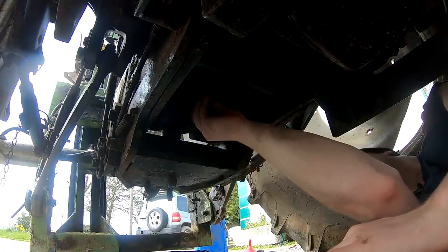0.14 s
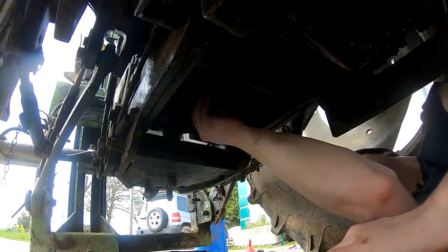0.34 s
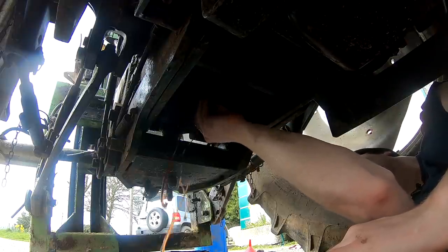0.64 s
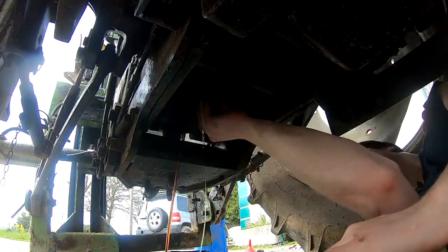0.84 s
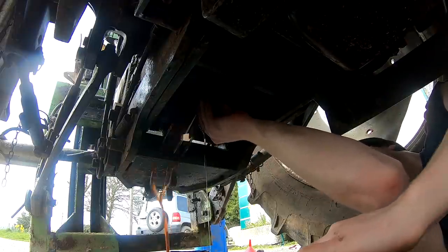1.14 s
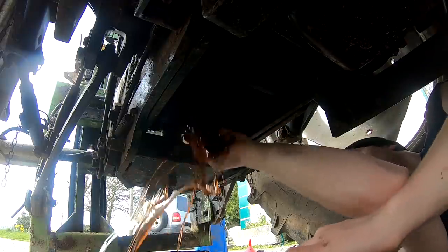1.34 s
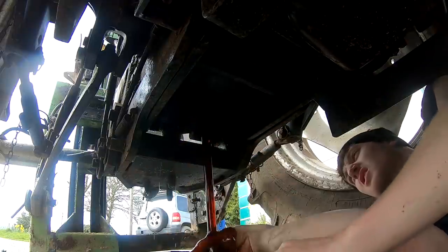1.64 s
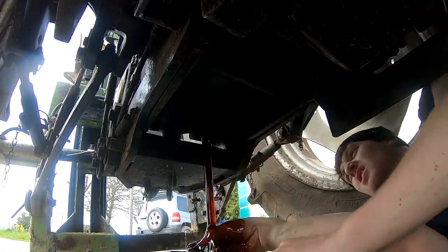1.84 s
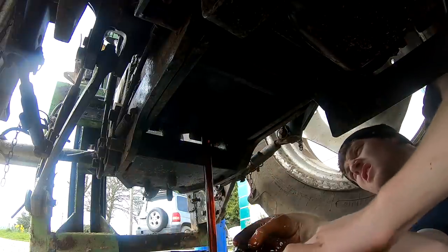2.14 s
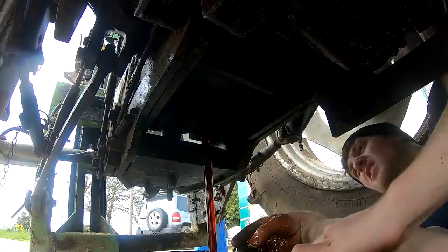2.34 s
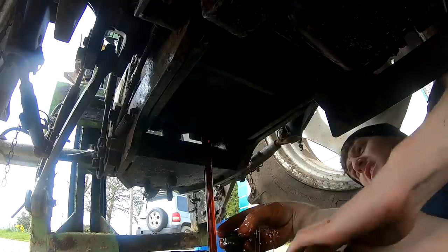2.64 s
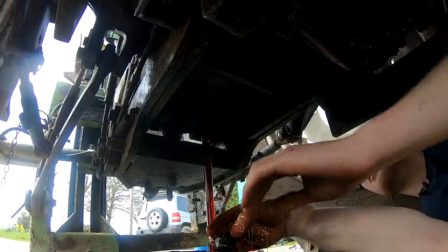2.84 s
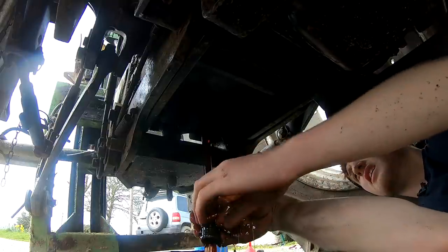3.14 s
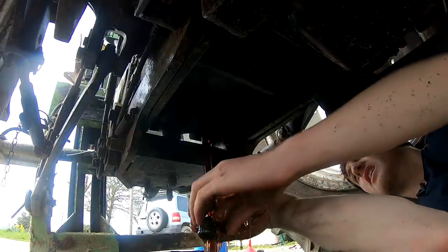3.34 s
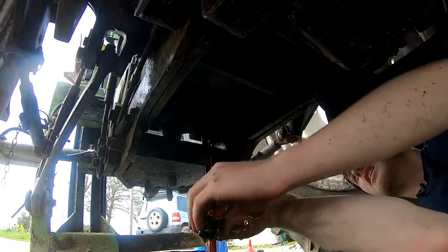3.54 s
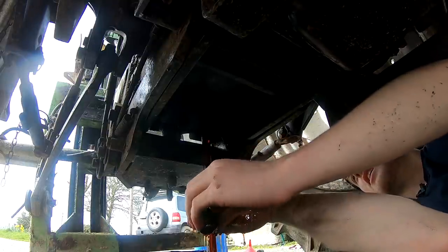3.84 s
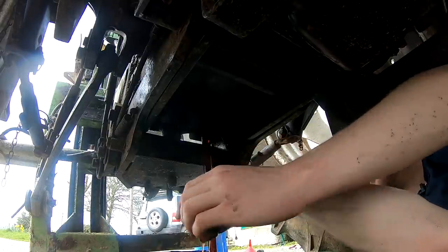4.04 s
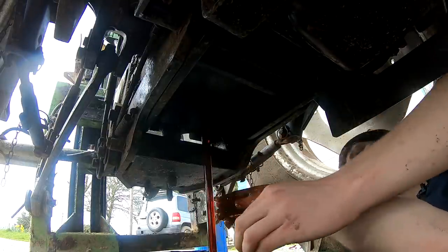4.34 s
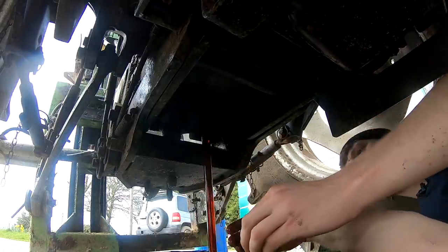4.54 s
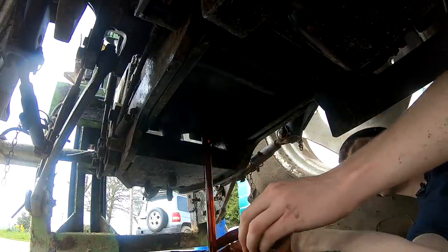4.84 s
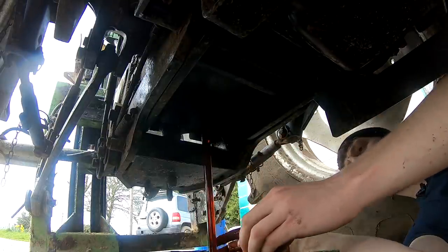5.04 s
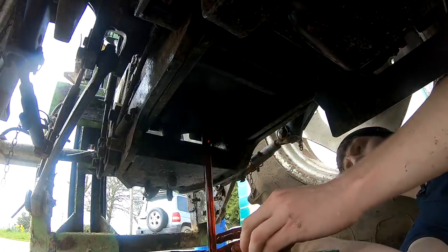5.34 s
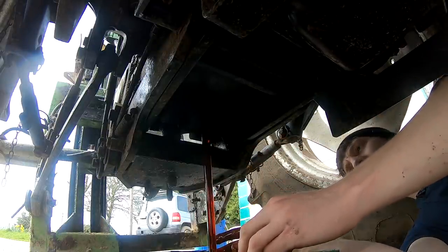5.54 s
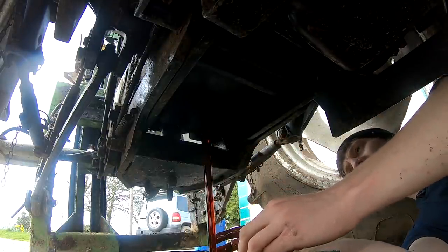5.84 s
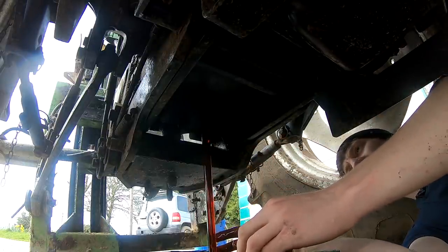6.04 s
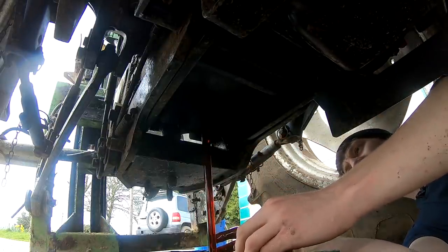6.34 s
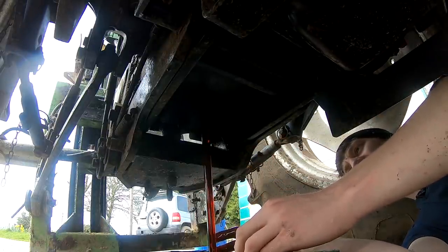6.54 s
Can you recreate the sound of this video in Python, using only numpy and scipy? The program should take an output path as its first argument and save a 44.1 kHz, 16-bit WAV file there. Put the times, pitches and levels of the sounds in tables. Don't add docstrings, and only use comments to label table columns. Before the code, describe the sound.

A few stray drops tick, then thick oil splatters hollowly into a plastic pan before quieting to faint drips over soft outdoor traffic rumble.

```python
import sys
import numpy as np
from scipy import signal
from scipy.fft import rfft, irfft, next_fast_len
from scipy.io import wavfile
from scipy.ndimage import uniform_filter1d

SR = 44100
rng = np.random.default_rng(int(sys.argv[2]) if len(sys.argv) > 2 else 0)


def store_pcm(level_fs):
    pcm = np.round(np.clip(level_fs, -1, 1) * 32767).astype(np.int16)
    wavfile.write(sys.argv[1], SR, np.atleast_2d(pcm).T)


def how_loud(loudness_db):
    steps = np.asarray(loudness_db, float) / 20
    return 10 ** steps


N = 295029
T = np.arange(N) / SR


def unit(x):
    return x / np.sqrt(np.mean(x ** 2))


def coloured(points, lo_hz=0, hi_hz=SR):
    hz, db = np.transpose(points)
    size = next_fast_len(N)
    f = np.arange(size // 2 + 1) * SR / size + 1e-3
    gain = how_loud(np.interp(np.log(f), np.log(hz), db, left=-90, right=-90))
    gain = gain * (f >= lo_hz) * (f < hi_hz)
    return unit(irfft(rfft(rng.standard_normal(size)) * gain, size)[:N])


def patchy(points, edges, rate, patchy_db):
    spectrum = rfft(coloured(points))
    f = np.arange(N // 2 + 1) * SR / N
    out = np.zeros(N)
    for lo, hi in zip(edges, edges[1:]):
        band = irfft(spectrum * (f >= lo) * (f < hi), N)
        out += band * how_loud(patchy_db * walk(rate))
    return unit(out)


def walk(rate):
    k = int(SR / rate)
    steps = np.repeat(rng.standard_normal(N // k + 1), k)
    return unit(uniform_filter1d(uniform_filter1d(steps, k), k)[:N])


def ring(x, hz, width):
    return signal.lfilter(*signal.iirpeak(min(hz, SR / 2.2), hz / width, fs=SR), x)


def fade(t, t60):
    return np.exp(-np.log(1000) * t / t60)


def burst(t60, rise_s):
    t = T[:int(SR * t60)]
    shape = (1 - np.exp(-t / rise_s)) * fade(t, t60)
    return shape / shape.max()


def patter(rate, spread_db, smear_s):
    chance = rng.random((2, N))
    landed = chance[0] < rate / SR
    sizes = landed * how_loud(spread_db * np.minimum(-np.log(chance[1] + 1e-9), 3))
    power = signal.lfilter([1], [1, -np.exp(-1 / (smear_s * SR))], sizes ** 2)
    return unit(np.sqrt(power + 1e-9))


def add(out, s, x):
    i = int(s * SR)
    out[i:i + len(x)] += x[:N - i]


def pan(modes, force):
    power, out = 0, np.zeros(N)
    for hz, width, db in modes:
        power += how_loud(db) ** 2 * np.pi * width / SR
        struck = ring(force * rng.standard_normal(N), hz, 6.6 * width)
        out += how_loud(db) * ring(struck, hz, width)
    return out / np.sqrt(power)


# start_s, flow_db, breakup_db (how much the jet breaks into spatter)
FLOW = [(0.978, -51, -9), (1.05, -36, -9.5), (1.19, -36.5, -9), (1.292, -29, -13.5), (1.476, -36, -10),
        (1.54, -27, -13.5), (1.59, -37.5, -0.5), (1.656, -38, -11), (1.744, -50, -6), (1.86, -43.5, -22.5),
        (2.01, -32.5, -10.5), (2.092, -39, -1.5), (2.158, -27, -7), (2.236, -31, -9.5), (2.338, -57.5, -14),
        (2.362, -41, -7), (2.53, -49.5, -8.5), (2.8, -67, -19)]
# start_s, peak_db, high_over_deep_db, spatter_db
SLUGS = [(0.689, -29, 2, -11), (0.696, -22, 13, -19), (0.708, -24.5, -17, -11),
         (0.761, -33.5, 6, -7.5), (0.982, -32, 3, -16.5), (1.021, -19.5, 7, -19.5),
         (1.039, -28, 1, -28), (1.063, -23.5, 25, -38), (1.092, -19.5, 10, -21), (1.11, -24, -13, -18),
         (1.151, -18, -1, -38), (1.197, -26.5, 28, -23), (1.22, -35, 22, -6), (1.244, -19.5, 6, -14.5),
         (1.289, -17.5, 16, -15.5), (1.331, -22, 5, -11.5), (1.349, -20, 7, -34),
         (1.379, -15.5, 13, -36), (1.416, -19.5, 15, -22), (1.472, -14.5, 12.5, -43),
         (1.525, -15.5, 11, -23), (1.565, -15.5, 12, -25), (1.584, -15, -2, -21),
         (1.606, -12.5, -1, -16), (1.63, -29, -14, -6), (1.666, -21.5, 5, -16), (1.688, -47, -7, 6),
         (1.718, -28.5, -5, -16),
         (1.772, -22, -14, -26), (1.822, -24, -14, -8.5), (1.846, -28, -7, -29),
              (1.867, -25, -18, -11), (1.928, -26.5, -15, -10), (1.973, -22.5, 1, -7),
              (2.015, -20, 25.5, -22), (2.077, -16, 10.5, -25), (2.111, -17, 15, -13.5),
              (2.139, -19, 24, -19), (2.175, -21.5, 22, -10.5), (2.231, -15, -7, -19),
              (2.371, -30, -33, -16), (2.401, -19.5, 3, -19.5), (2.44, -26, -17, -14.5),
              (2.479, -28.5, 9, -19)]
# start_s, peak_db, t60_s
SPLATS = [(0.699, -33, 0.074), (0.763, -42, 0.046), (1.0235, -43.5, 0.16), (1.159, -38.5, 0.41),
          (1.245, -43.5, 0.071), (1.279, -36.5, 0.14), (1.407, -35, 0.29), (1.47, -31.5, 0.089),
          (1.5196, -35, 0.13), (1.5393, -35, 0.56), (1.6047, -35, 0.18), (1.6645, -34.5, 0.2),
          (1.687, -36, 0.046), (1.7163, -26.5, 0.024), (1.769, -32.5, 0.11), (1.82, -42.5, 0.32),
          (1.904, -40, 0.15), (2.031, -35.5, 0.19), (2.0566, -30.5, 0.13), (2.0774, -26, 0.14),
          (2.2335, -35, 0.032), (2.315, -37, 0.035), (2.4014, -45, 0.27)]
# pitch_hz, width_hz, level_db
DEEP_MODES = [(165, 28, -14.5), (241, 43, -9.5), (290, 26, -1.5), (356, 21, 1), (418, 47, 2)]
MIDDLE_MODES = [(476, 46, -2), (532, 36, -2), (563, 35, -4), (653, 49, 3.5), (705, 450, -20.5)]
UPPER_MODES = [(842, 16.5, -0.5), (966, 32, 3), (1068, 82, -5), (1115, 49, -3.5), (1220, 32, -3.5),
               (1401, 38, -13.5), (1650, 19, -13)]
# pitch_hz, level_db (per Hz)
SPATTER_COLOUR = [(850, 10), (1450, -4.5), (1690, 0.5), (1820, 1.5), (1990, -2), (2670, 2), (3090, -4.5),
                  (3290, -4.5), (3960, -12.5), (5000, -17.5), (6500, -25), (11000, -120)]
SPRAY_COLOUR = [(2650, 9), (4500, 0), (6820, -7), (7800, -10.5), (10400, -11.5), (12700, -11), (13600, -16)]


def gush():
    s, flow_db, breakup_db = np.transpose(FLOW)
    drum = how_loud(np.interp(T, s, flow_db, left=-120, right=-120))
    clumps = how_loud(3 * walk(45))
    spatter = how_loud(np.interp(T, s, flow_db + breakup_db, left=-120, right=-120)) * clumps
    spray = spatter * how_loud(-12.5)
    shake = drum * how_loud(-18)
    drops = patter(670, spread_db=-2.0, smear_s=0.0018)

    slugs = np.zeros((4, N))
    for s, db, high_db, spatter_db in SLUGS:
        shares_db = (-12 - high_db / 2, -3, -10.5 + high_db / 2, spatter_db)
        for line, rel_db in zip(slugs, shares_db):
            add(line, s - .0015, how_loud(db + rel_db) * burst(0.12, rise_s=0.00082))
    splats = np.zeros(N)
    for s, db, t60 in SPLATS:
        add(splats, s - .001, how_loud(db - 11) * burst(max(t60, .02), rise_s=0.003))

    deep, middle, upper = [np.hypot(how_loud(db) * drum * drops, how_loud(-10.0) * slug)
                           for db, slug in zip((-9, -5, -7), slugs)]
    body = pan(DEEP_MODES, deep) + pan(MIDDLE_MODES, middle) + pan(UPPER_MODES, upper)
    slap = coloured([(200, -18), (350, -2.0), (700, 9.5), (1200, -9.5), (2000, -5.5), (3000, -55)])
    body += how_loud(-6.5) * middle * slap
    body = np.interp(T + .0004 * walk(20), T, body)

    splash = np.hypot(spatter * patter(450, spread_db=5.5, smear_s=.0015), how_loud(-6) * slugs[3])
    splash = splash * patchy(SPATTER_COLOUR, np.geomspace(800, 7000, num=12), 60, patchy_db=2.5)
    mist = np.hypot(spray * drops * patter(200, spread_db=3.0, smear_s=.003), splats)
    mist = mist * patchy(SPRAY_COLOUR, np.geomspace(2500, 14000, num=16), 90, patchy_db=3)
    ground = coloured([(18, -5), (60, 9.0), (160, -8.0), (280, -35)])
    ground = shake * how_loud(2.8 * walk(26.3)) * ground
    return body + splash + mist + how_loud(-4.5) * ground


# start_s, peak_db, pitch_hz (centre of the slap)
BLOWS = [(0.701, -31.5, 616), (0.711, -20.5, 484), (0.7615, -27.5, 2027), (0.984, -42, 784),
         (1.027, -19.5, 700), (1.041, -27, 810), (1.067, -20, 690), (1.096, -19, 680), (1.112, -25, 756),
         (1.154, -23, 610), (1.298, -23, 600), (1.336, -23, 506), (1.474, -18.5, 800), (1.565, -14.5, 604),
         (2.401, -24, 664), (1.247, -12.5, 687), (1.352, -28, 515), (1.382, -18, 660), (1.577, -11.5, 552),
         (1.609, -13.5, 611), (1.629, -26, 508), (1.637, -39, 700), (1.672, -22.5, 512),
         (1.718, -20.5, 2970), (1.771, -25, 2820), (1.822, -35, 2700), (1.85, -22, 557), (1.849, -31, 4060),
         (1.869, -27, 2600), (1.977, -21, 596), (2.078, -17.5, 884), (2.131, -21, 826), (2.182, -12.5, 896),
         (2.194, -18.5, 810), (2.236, -19, 614)]


def blows():
    out, t = np.zeros(N), T[:2000]
    for s, db, hz in BLOWS:
        spread, phase = rng.random((2, 5, 1))
        tones = hz * how_loud(5.5 * (2 * spread - 1))
        hit = np.sum(np.sin(2 * np.pi * tones * t + phase), axis=0)
        hit = hit * fade(t, 0.047) * (1 - np.exp(-t / 0.00022))
        hit = ring(hit, hz, 0.63 * hz)
        add(out, s - .001, how_loud(db - 6.5) * hit / abs(hit).max())
    return out


# start_s, peak_db, pitch_hz, breadth (share of pitch)
TICKS = [
    (0.217, -41.5, 1520, 0.48),
    (0.481, -49.5, 1560, 0.44),
    (0.5078, -38, 1025, 0.44),
    (0.823, -47, 1900, 0.64),
    (0.8507, -52, 1650, 0.51),
    (0.8916, -51, 2500, 0.21),
    (0.927, -49, 2390, 0.32),
    (2.316, -39, 4900, 0.31),
]
# start_s, peak_db, pitch_hz, t60_s, breadth (share of pitch)
PLOPS = [(0.703, -28.5, 410, 0.14, 0.14), (0.768, -36, 312, 0.12, 0.39), (1.334, -27, 290, 0.21, 0.023),
         (1.654, -28.5, 168, 0.14, 0.76), (1.849, -36.5, 200, 0.1, 0.63), (2.971, -51, 312, 0.2, 0.13),
         (3.568, -41.5, 1160, 0.06, 0.15), (3.941, -49.5, 467, 0.15, 0.12), (3.944, -41, 806, 0.072, 2.6),
         (3.956, -48, 173, 0.34, 0.37), (5.91, -37, 685, 0.17, 0.95)]
# start_s, peak_db, pitch_hz
DRIPS = [(2.6252, -42.5, 2320), (2.6403, -41, 3090), (2.7364, -46, 2240), (2.7828, -54.5, 3030),
         (2.8046, -52.5, 2770), (2.9983, -65, 2100), (3.0174, -46, 2770), (3.2028, -55, 2170),
         (3.2557, -58, 2500), (3.2996, -51, 2750), (3.3262, -44, 2400), (3.085, -49.5, 2700),
         (2.643, -44, 1370), (3.3333, -38.5, 2580), (3.346, -54, 2700), (3.3814, -58, 3570),
         (3.4786, -48.5, 3130), (3.553, -57, 1920), (3.5984, -56, 3520), (3.6706, -47.5, 2670),
         (3.7466, -60, 2920), (3.8274, -57, 2240), (3.9318, -53, 2930), (3.9442, -65, 1830),
         (4.3024, -63, 2000), (4.526, -68, 2200), (4.5756, -57, 2650), (4.6347, -59, 2800),
                (4.6855, -56, 2550), (4.694, -53, 2530), (4.763, -58, 3480), (4.7948, -56, 2700),
                (4.8571, -71, 3410), (4.905, -60, 2840), (4.947, -47.5, 4500), (5.0018, -72, 2550),
                (5.023, -50, 3800), (5.0621, -55, 2180), (5.175, -50, 2780), (5.216, -55.5, 2630),
                (5.2577, -59, 3250), (5.269, -58, 2540), (5.283, -55, 2130), (5.3016, -53.5, 3340),
                (5.3427, -52, 2620), (5.3794, -61, 2800), (5.4173, -70, 2150), (5.462, -58.5, 2160),
                (5.4972, -55, 2530), (5.557, -61, 2230), (5.6443, -55.5, 2840), (5.7885, -57, 2060),
                (5.8425, -51, 3040), (5.8713, -64, 2830), (5.9032, -46, 2640), (5.9561, -60, 3560),
                (5.9783, -59, 3890), (6.026, -55.5, 2700), (6.0664, -54.5, 2750), (6.1184, -59.5, 3570),
                (6.182, -64, 2880), (6.2155, -59, 2640), (6.2655, -56, 3720), (6.2734, -55, 3320),
                (6.3382, -68, 2390), (6.3596, -56, 2700), (6.3886, -59, 3420), (6.4136, -54.5, 2830),
                (6.46, -56, 3350), (6.4914, -61, 2650), (6.5652, -72, 1990), (6.5652, -55, 2870),
                (6.619, -54, 2640), (6.661, -59, 2700)]
# start_s, peak_db, pitch_hz
FINE_TICKS = [(2.7313, -57.5, 5360), (3.044, -58, 6060), (3.3254, -55, 3600), (3.508, -54.5, 5750),
              (3.7478, -54, 4970), (3.946, -56, 6150), (4.765, -59.5, 8740), (4.8966, -60, 10300),
              (5.2166, -55.5, 5200), (5.2708, -55, 4930), (5.582, -65, 5800), (5.9053, -49, 4870),
              (6.278, -54, 4970), (6.3393, -60, 5300),
              (5.0318, -66, 9600), (5.055, -66, 11000), (5.075, -63, 11500), (5.0892, -63, 10000),
              (5.117, -63, 8000), (5.1361, -59, 12900), (5.245, -63, 10100), (0.713, -43.5, 11000),
              (2.83, -61, 4770), (2.69, -64, 11100), (2.734, -62, 11800), (3.061, -55, 3940),
              (3.075, -63, 9000), (3.09, -70, 11000), (3.258, -60, 6000), (3.345, -53, 4900),
              (3.396, -56, 3660), (3.42, -67, 5000), (3.77, -63, 5960), (3.855, -59, 6950),
              (0.219, -48, 2900), (0.508, -54.5, 2870)]


def ticks():
    drip_t60_s = .055
    rows = [(s, db, hz, .06, breadth) for s, db, hz, breadth in TICKS] + PLOPS
    rows += [(*row, drip_t60_s, .25) for row in DRIPS]
    rows += [(*row, drip_t60_s, .32) for row in FINE_TICKS]
    out = np.zeros(N)
    for s, db, hz, t60, breadth in rows:
        shape = burst(max(t60, .01), rise_s=.001)[:8000]
        t = T[:len(shape)]
        noise = rng.standard_normal(8000)
        width = np.clip(breadth, .03, 1.5) * hz
        ping = np.sin(2 * np.pi * hz * t * (1 + 4 * t))
        wet = unit(ring(ring(noise, hz, 3.4 * width), hz, width))[-len(shape):]
        crack = (wet + how_loud(-2) * ping * shape) * shape
        snap = unit(ring(noise, 0.48 * hz, 1.05 * hz))[:len(shape)] * shape ** 3
        crack = crack / abs(crack).max() + 0.057 * snap
        add(out, s - .001, how_loud(db) * crack / abs(crack).max())
    return out


# start_s, peak_db
KNOCKS = [
    (5.905, -24),
]
# pitch_hz, level_db, t60_s
KNOCK_MODES = [(143.6, 3, 0.21), (175, -7, 0.12), (388, -7, 0.14), (461, 2, 0.099), (614, 3.5, 0.064),
               (943, -1.5, 0.085), (1117, 5, 0.036), (1634, -5, 0.051), (2700, -12, 0.045)]


def knock():
    out = np.zeros(N)
    t = T[:SR // 3]
    for s, db in KNOCKS:
        walls = np.zeros(len(t))
        for hz, mode_db, t60 in KNOCK_MODES:
            tone = np.sin(2 * np.pi * hz * t + 2 * np.pi * rng.random())
            build = 1 - np.exp(-(t / (0.0018 + 2.8 / hz)) ** 2)
            walls += how_loud(mode_db) * tone * fade(t, t60) * build
        scuff = ring(rng.standard_normal(len(t)), 1360, 720)
        scuff = scuff * fade(t, 0.044) * (1 - np.exp(-t / 0.0021))
        hit = walls + how_loud(6.5) * scuff
        add(out, s - .004, how_loud(db - 7.5) * hit / abs(hit).max())
    return out


# start_s, traffic_db, trickle_db
SWELLS = [(0.0, -52.5, -90), (0.568, -48, -91), (0.758, -63.5, -76), (0.9, -49.5, -88), (2.83, -56, -82.5),
          (3.08, -47, -82), (3.5, -51, -88.5), (3.85, -48, -81.5), (4.1, -54, -90.5), (4.5, -47, -87),
          (4.74, -59.5, -77.5), (4.98, -51.5, -83.5), (5.14, -53.5, -74.5), (5.47, -55.5, -83.5),
          (5.87, -52, -79.5), (6.18, -55, -84), (6.69, -51, -82)]


def trickle():
    out = np.zeros(N)
    t = T[:600]
    s, _, trickle_db = np.transpose(SWELLS)
    for when, pitch, size in rng.random((800, 3)):
        start_s = 2.6 + 4.05 * when
        hz = 2100 * how_loud(10 * pitch ** 2)
        swell_db = np.interp(start_s, s, trickle_db - trickle_db.mean())
        gain = how_loud(-62 + 14 * size ** 2 - 8 * pitch + .6 * swell_db)
        speck = np.sin(2 * np.pi * hz * t) * np.sin(np.pi * t / t[-1]) * np.exp(-t / 0.0015)
        add(out, start_s, gain * speck)
    return out


# pitch_hz, level_db (per Hz)
AIR_COLOUR = [(15, -24), (25, 0.5), (60, 2.5), (110, 2), (250, -8), (500, -9), (1000, -11.5), (1450, -15),
              (1700, -21), (2600, -23), (4000, -27.5), (6300, -34), (10000, -37.5), (13500, -37)]


def yard():
    slow_t = T[::64]
    s, traffic_db, trickle_db = np.transpose(SWELLS)
    rumble = 4 * walk(4.08)[::64]
    traffic = np.interp(slow_t, s, traffic_db - traffic_db.mean())
    stream = np.interp(slow_t, s, trickle_db - trickle_db.mean())
    share_hz = np.log([120, 300, 1200, 2200, 5000, 11000])
    followers = [(rumble, [0.54, 0.052, 0.071, 0.12, 0.05, 0.02]),
                 (traffic, [0.0, 0.25, 1.0, 0.44, 0.093, 0.014]),
                 (stream, [0, 0.085, 0.54, 0.55, 0.55, 0.082])]
    spectrum = rfft(how_loud(-57) * coloured(AIR_COLOUR))
    f = np.arange(N // 2 + 1) * SR / N
    edges, out = np.geomspace(15, 14000, num=25), np.zeros(N)
    for lo, hi in zip(edges, edges[1:]):
        swell = sum(np.interp(np.log(lo), share_hz, share) * line for line, share in followers)
        flicker = 1.88 * min(1, (4000 / lo) ** 0.23) * walk(25)
        band = irfft(spectrum * (f >= lo) * (f < hi), N)
        out += band * how_loud(np.repeat(swell, 64)[:N] + flicker)
    return out


def underside(x):
    t = T[:SR // 4]
    tail = rng.standard_normal(len(t)) * fade(t, 0.1)
    tail = signal.lfilter([1], [1, -.5], tail)
    tail = tail / np.sqrt(np.sum(tail ** 2))
    return x + how_loud(-17) * signal.fftconvolve(x, tail)[:N]


def treble_gate(x):
    f, _, z = signal.stft(x, SR, nperseg=1024, noverlap=768)
    power = uniform_filter1d(abs(z) ** 2, size=3, axis=2)
    near = uniform_filter1d(power, size=4, axis=1)
    wide = uniform_filter1d(power, size=40, axis=1)
    whole = power.sum(axis=1, keepdims=True)
    least = np.maximum(wide * how_loud(2 * -5), whole * how_loud(2 * -59))
    weak = (near < least) & (f[:, None] > 4800)
    z = z * np.where(weak, how_loud(-25), 1)
    return signal.istft(z, SR, nperseg=1024, noverlap=768)[1][:, :N]


def scene():
    oil = gush() + blows() + ticks() + trickle() + knock()
    return (underside(oil) + yard())[None]


def roll_off(x):
    return signal.sosfilt(signal.butter(12, 13740, fs=SR, output="sos"), x)


def record(dry):
    thin = signal.sosfilt(signal.butter(1, 30, "high", fs=SR, output="sos"), dry)
    thin = signal.sosfilt(signal.ellip(12, .3, 70, 13560, fs=SR, output="sos"), thin)
    return roll_off(treble_gate(thin))


dry = scene()
out = record(dry)
store_pcm(out)
```